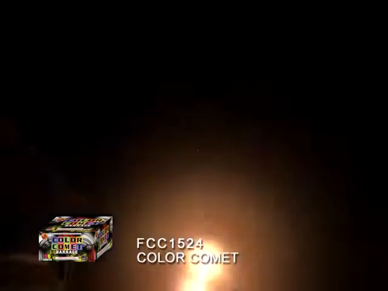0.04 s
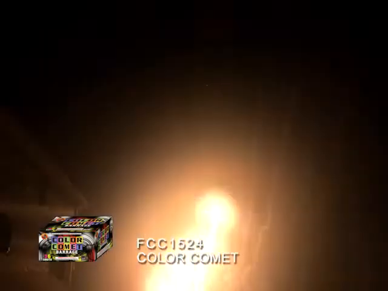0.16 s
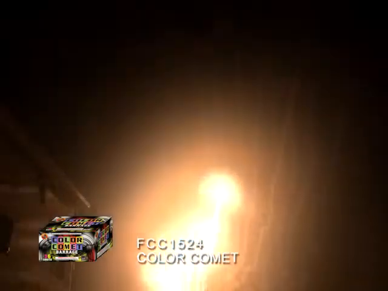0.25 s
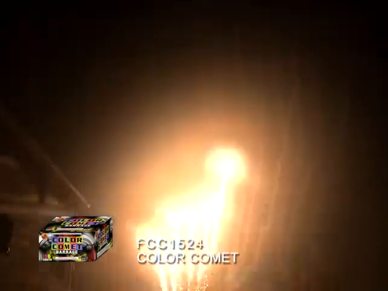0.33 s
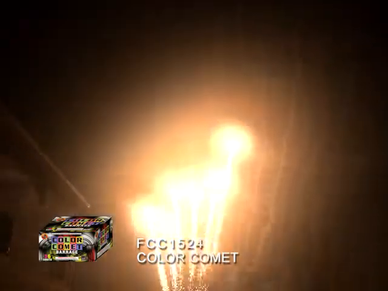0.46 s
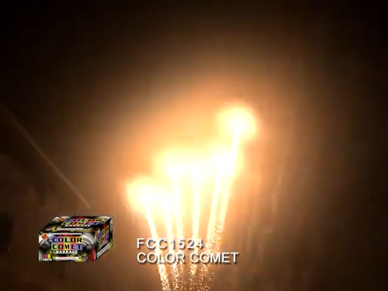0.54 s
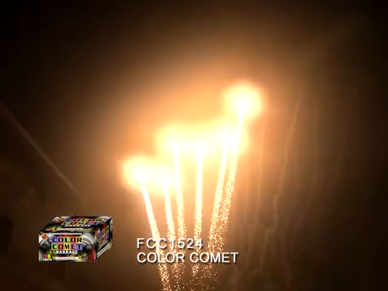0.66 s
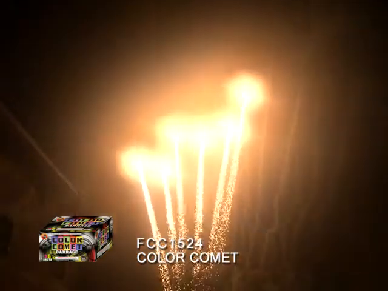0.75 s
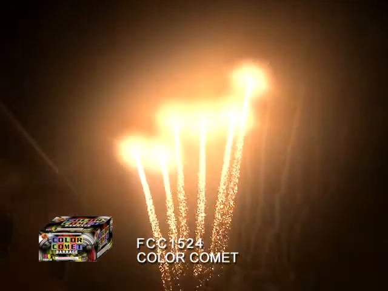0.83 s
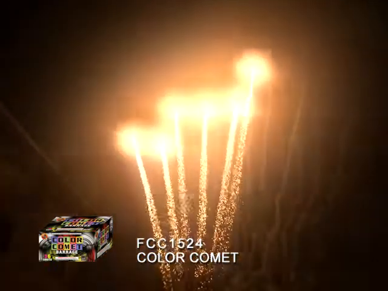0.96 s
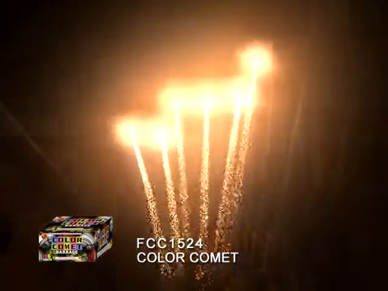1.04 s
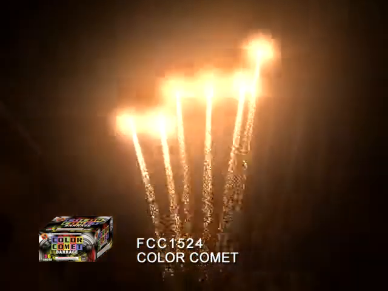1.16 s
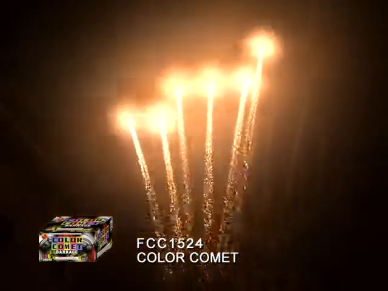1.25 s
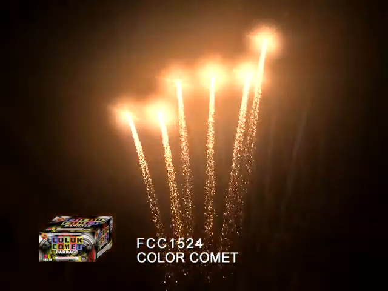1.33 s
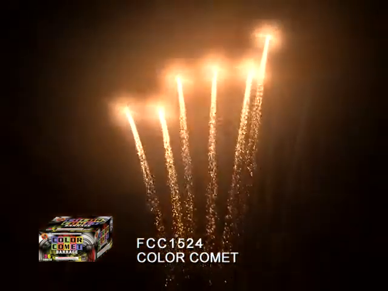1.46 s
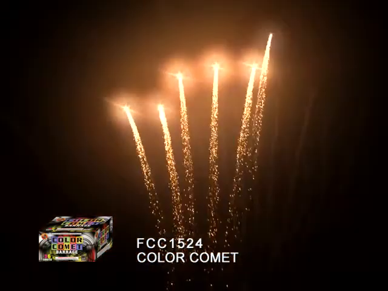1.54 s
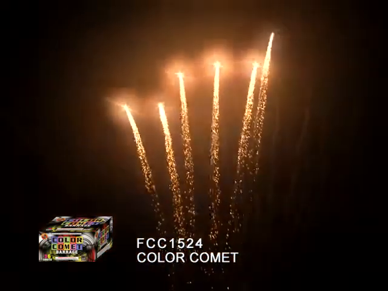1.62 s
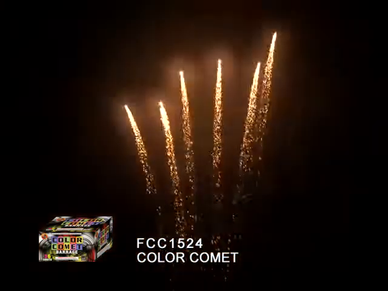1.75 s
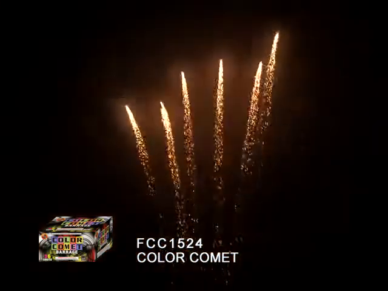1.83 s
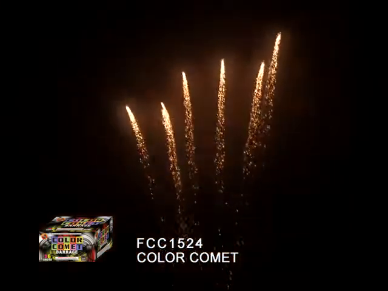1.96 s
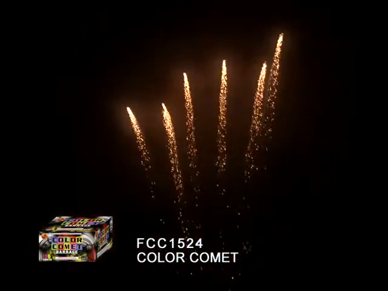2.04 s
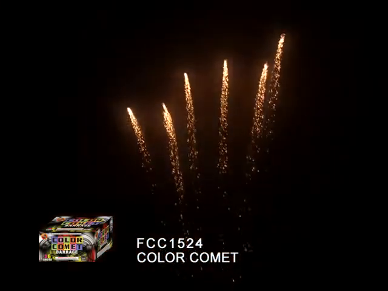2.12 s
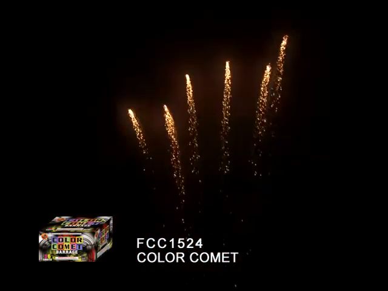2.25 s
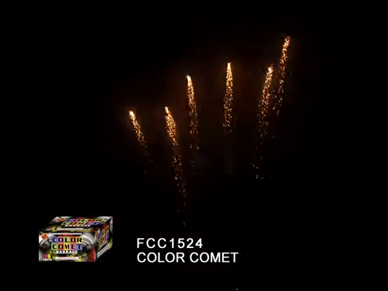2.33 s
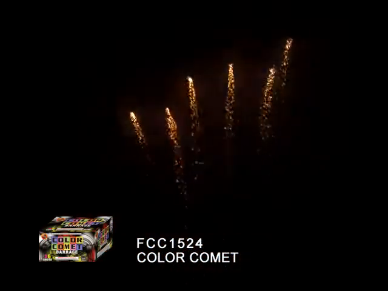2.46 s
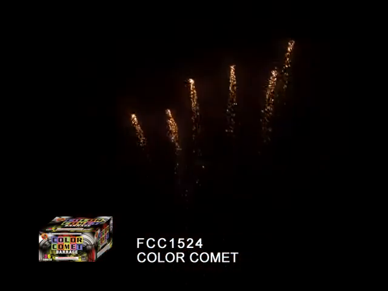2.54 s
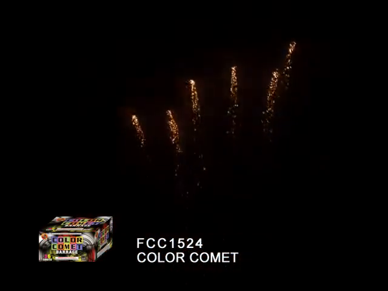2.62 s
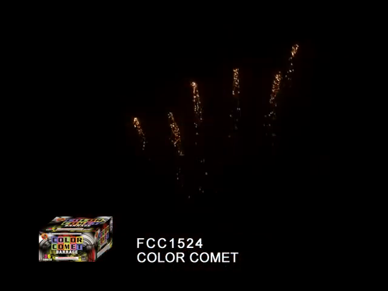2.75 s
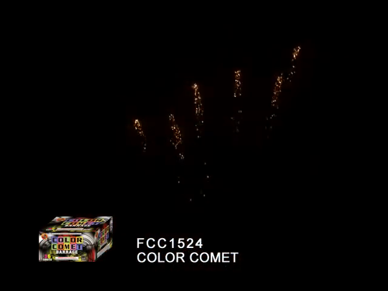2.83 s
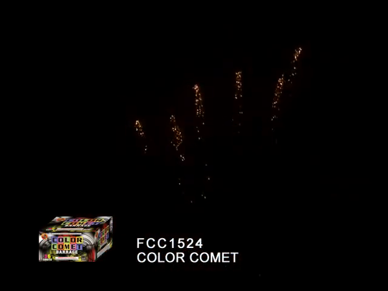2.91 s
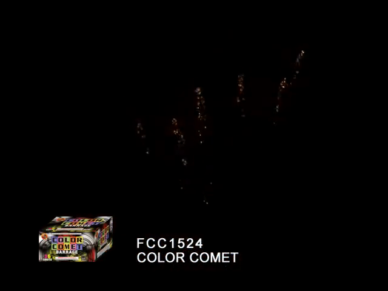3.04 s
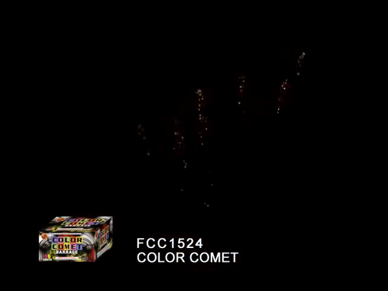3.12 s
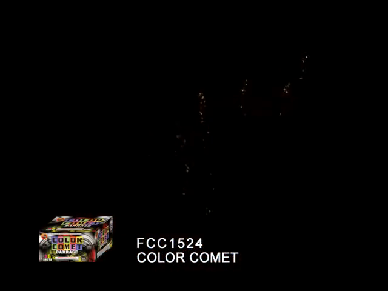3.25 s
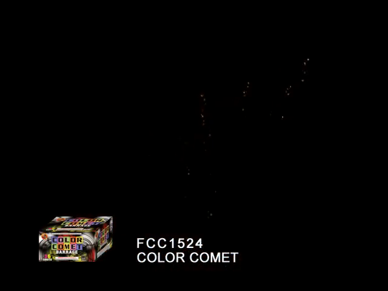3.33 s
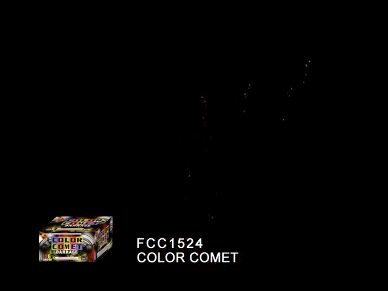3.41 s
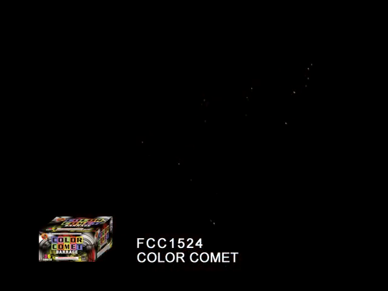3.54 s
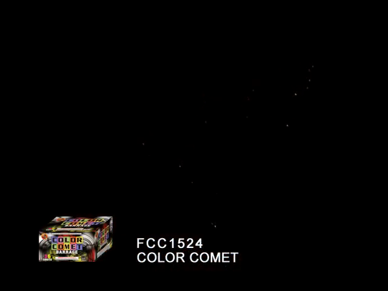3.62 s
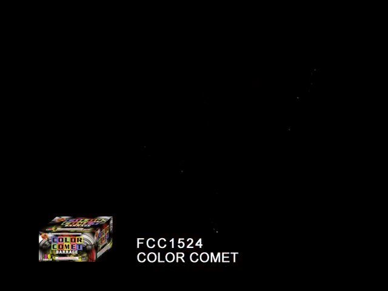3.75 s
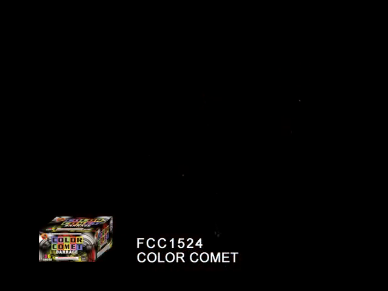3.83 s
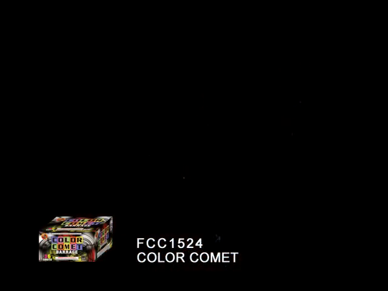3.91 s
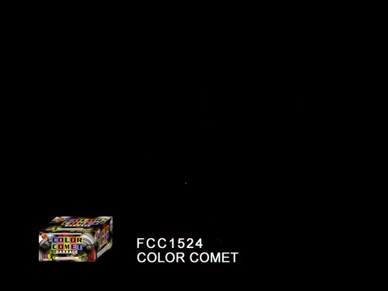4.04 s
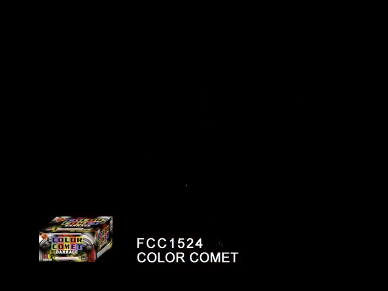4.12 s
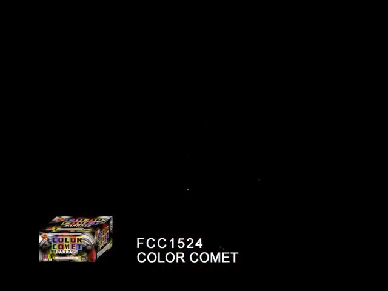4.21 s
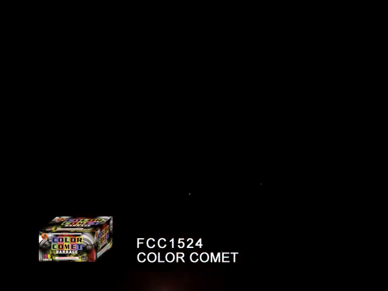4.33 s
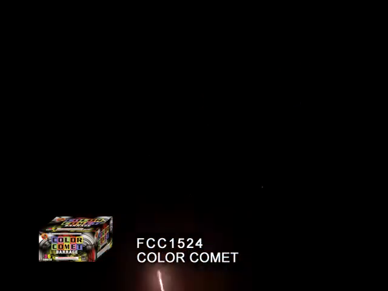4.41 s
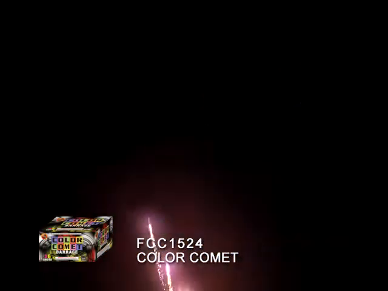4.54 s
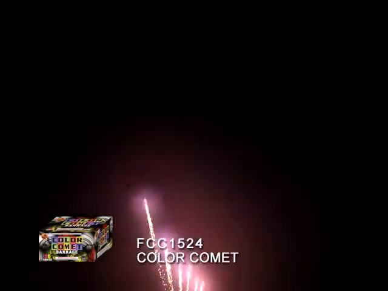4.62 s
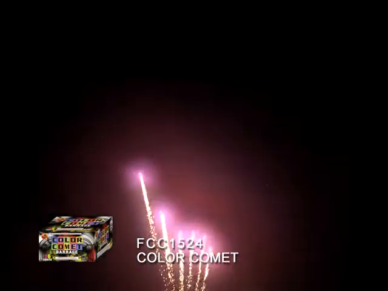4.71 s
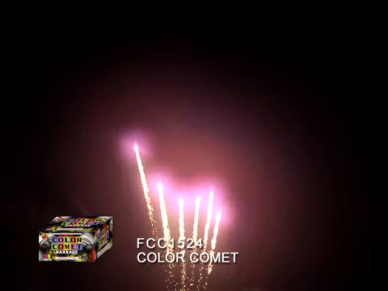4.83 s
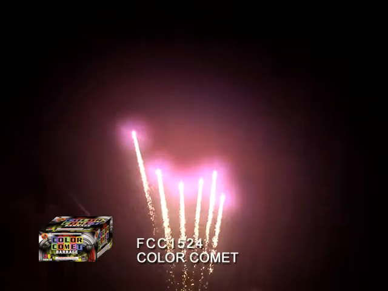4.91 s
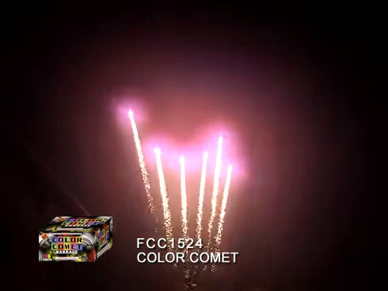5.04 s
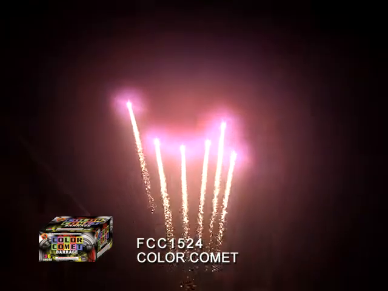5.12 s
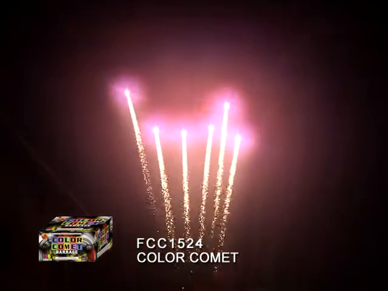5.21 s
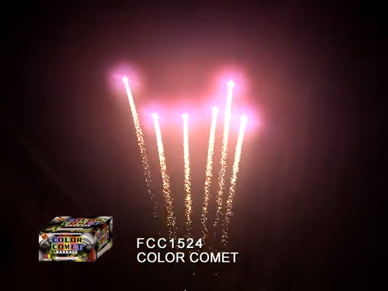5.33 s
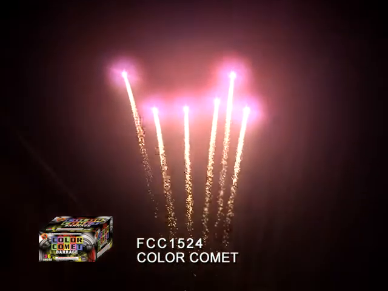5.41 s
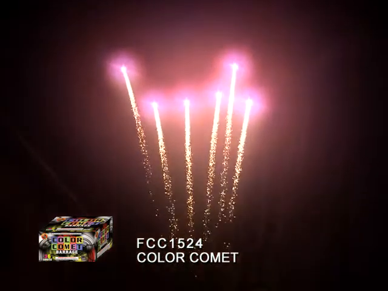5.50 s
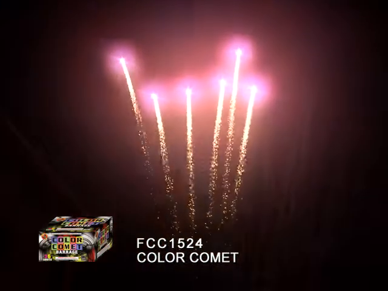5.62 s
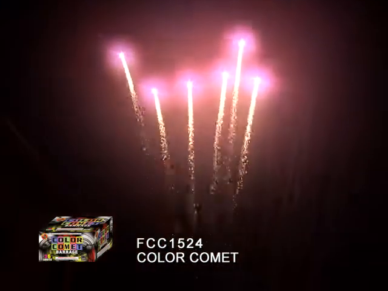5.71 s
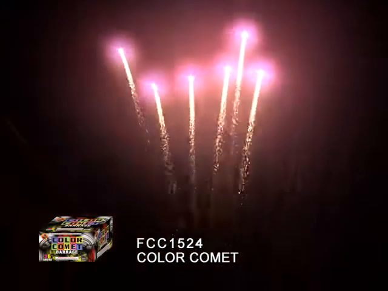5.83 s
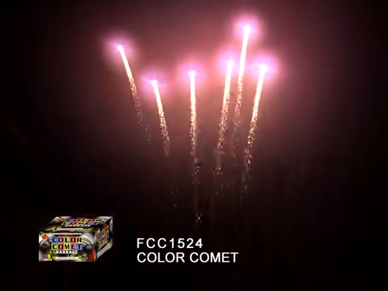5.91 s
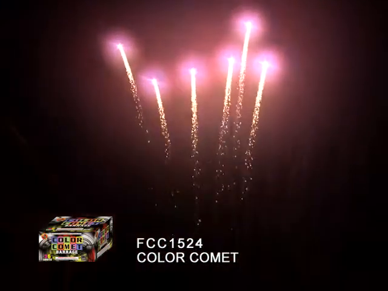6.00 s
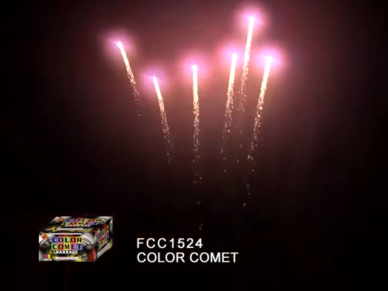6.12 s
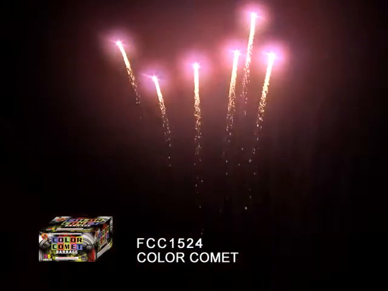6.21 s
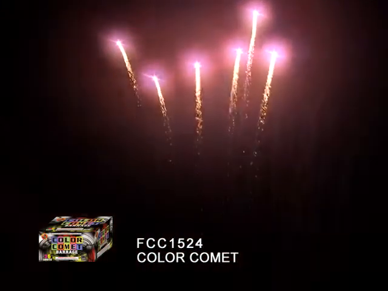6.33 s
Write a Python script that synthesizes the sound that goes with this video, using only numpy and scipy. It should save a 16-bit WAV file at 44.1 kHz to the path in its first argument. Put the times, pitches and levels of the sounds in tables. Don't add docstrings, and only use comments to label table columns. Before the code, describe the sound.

Two volleys of hard, overloaded firework bangs crack and echo between yard walls, sparks fizzing away over faint traffic rumble; nearly all on the left.

```python
import sys
import numpy as np
from scipy import signal
from scipy.io import wavfile
from scipy.ndimage import uniform_filter1d

SR = 44100
rng = np.random.default_rng(int(sys.argv[2]) if len(sys.argv) > 2 else 0)


def elevation(decibels):
    levels = np.asarray(decibels, float)
    return 10 ** (levels / 20)


def generate_wav(sig):
    pcm = np.round(np.clip(np.atleast_2d(sig).T, -1, 1) * 32767).astype(np.int16)
    wavfile.write(sys.argv[1], SR, pcm)


N = 280520

# (time [s], shock peak [dB],
# spark spit [dB])
SHARP_SHOCKS = [(0.2014, -1, -13), (0.3141, 2, -11), (0.3894, -6, -14.5), (0.4178, -0.5, -23),
                (0.573, -10, -38), (0.6394, -27.5, -36), (0.666, -8.5, -44), (0.7094, -34, -55),
                (4.6189, -3.5, -13), (4.6885, -4.5, -18), (4.76, -4.5, -15), (4.7994, -13, -18),
                (4.8304, -9.5, -20), (4.8569, -19, -25), (5.0394, -24, -31), (5.0894, -29, -44)]
# (frequency [Hz], level [dB])
FIZZ_COLOUR = [(200, -21.5), (800, 2.5), (2000, -1), (4300, 1), (6500, -0.5), (8500, -5.5), (11000, -11),
               (15000, -22)]


def evened(x):
    return x / np.sqrt(np.mean(x ** 2) + 1e-20)


def read(points, hz):
    f, value = np.transpose(points)
    return np.interp(np.log(hz + 1), np.log(f + 1), value)


def coloured(x, points):
    hz = np.abs(np.fft.fftfreq(4096, 1 / SR))
    log_gain = np.log(elevation(np.maximum(read(points, hz), -100)))
    min_phase = np.exp(np.conj(signal.hilbert(log_gain)))
    taps = np.fft.ifft(min_phase).real[:2048]
    return signal.oaconvolve(x, taps / np.linalg.norm(taps))[:len(x)]


def resonate(x, hz, width):
    r = np.exp(-np.pi * width / SR)
    return 2 * signal.lfilter([1 - r], [1, -r * np.exp(2j * np.pi * hz / SR)], x).real


def grains(per_s, spread_db):
    size = elevation(spread_db * np.minimum(rng.exponential(1, N), 5))
    size = size * rng.choice([-1, 1], N)
    return evened(size * (rng.random(N) < per_s / SR))


def flutter(hz, depth_db):
    knots = rng.standard_normal(int(N / SR * hz) + 3)
    return elevation(depth_db * np.interp(np.arange(N) / SR * hz, np.arange(len(knots)), knots))


def envelope(events, rise_s):
    out = np.zeros(N)
    for s, db, t60 in events:
        part = out[round(s * SR):][:round(t60 * SR)]
        u = np.arange(len(part)) / SR
        part += elevation(db - 60 * u / t60) * (1 - np.exp(-u / rise_s))
    return out


def waver(hz, slip):
    return np.sqrt(2) * np.sin(2 * np.pi * np.cumsum(hz * flutter(5.3, 9.12 * slip)) / SR)


def since(s):
    age = np.arange(N) / SR - s
    return age, np.clip(age / 0.0007, 0, 1) + 0.028 * (age > -.003)


def patchy(x, depth_db):
    z = signal.stft(x, nperseg=512)[2]
    patches = uniform_filter1d(rng.standard_normal(z.shape), size=4, axis=0)
    patches = uniform_filter1d(patches, size=8, axis=1)
    return signal.istft(z * elevation(depth_db * evened(patches)), nperseg=512)[1][:N]


def open_input():
    # (time [s], height [dB])
    thumps = [
        (1.6725, -27),
        (2.3525, -28.5),
        (2.8922, -29),
        (4.3322, -28.5),
    ]
    # (frequency [Hz], level [dB])
    hiss_colour = [(100, 0), (6000, 0), (11000, -2), (13000, -8), (14200, -20), (16000, -40)]
    t, step = np.arange(N) / SR, np.zeros(N)
    slope_s = .0075
    for s, db in thumps:
        up = np.clip((t - s) / slope_s, 0, 1)
        down = np.clip((t - s - .02) / slope_s, 0, 1)
        step += elevation(db) * (up - down)
    for tau_s in (.0125, .07):
        r = np.exp(-1 / (tau_s * SR))
        step = signal.lfilter([r, -r], [1, -r], step)
    hiss = coloured(rng.standard_normal(N), hiss_colour)
    ripple = evened(resonate(resonate(rng.standard_normal(N), 280., 300), 280., 400))
    ripple = ripple * uniform_filter1d(np.abs(step), size=900)
    return step + elevation(-27) * ripple + elevation(-77.6) * hiss


def town():
    # (frequency [Hz], density [dB per Hz])
    rumble_colour = [(18, -38), (30, -17), (85, -16.5), (213, -11), (243, -12.5), (359, -17), (432, -18),
                     (970, -16), (1080, -13), (2180, -22.5), (2360, -24), (13300, -48), (15500, -78)]
    # (loudest [s], length [s], whine [dB], whine [Hz], blur [0-1])
    traffic = [
        (0.05, 1.2, -51, 1080, 0.6),
        (1.4, 1.6, -51, 1095, .5),
        (2.45, 1.24, -50.5, 1090, 0.08),
        (3.24, 0.8, -53, 1090, 0.35),
        (3.83, 0.81, -48, 1075, 0.4),
        (4.39, 0.7, -52.5, 1027, 0.7),
        (5.5, 1.1, -68, 1060, 0.4),
    ]
    # (frequency [Hz], level [dB])
    generator = [(59, -64), (118.4, -59), (177.6, -65.5), (215.3, -59), (300, -64.5)]
    rumble_db, swell_db = -45, -2
    t, air = np.arange(N) / SR, rng.standard_normal(N)
    rumble = coloured(rng.standard_normal(N), rumble_colour) * flutter(4.2, 0.37)
    passing, whine = 0, 0
    for s, length, db, hz, blur in traffic:
        near = elevation(db) * np.clip(1 - (2 * (t - s) / length) ** 2, 0, 1)
        passing = passing + near
        tone = waver(hz, 0.00386) * flutter(11, 2.5)
        fuzz = evened(resonate(air, hz, 60))
        whine = whine + near * ((1 - blur) * tone + blur * fuzz)
    hum = sum(elevation(db) * waver(f, 0.015) * flutter(8.1, 4.6) for f, db in generator)
    preamp = elevation(-72) * rng.standard_normal(N)
    return preamp + (elevation(rumble_db - 1.5) + elevation(swell_db) * passing) * rumble + whine + hum


def far_bangs():
    # (time [s], peak [dB], t60 [s], brightness [dB])
    bursts = [
        (0.1194, -55, 0.67, 8),
        (1.8194, -32, 0.19, -3),
        (2.3994, -34, 0.78, -3),
        (2.972, -34, 1, -1),
        (3.5204, -44.5, 0.71, -7),
        (4.1314, -41.5, 1, -23),
    ]
    # (frequency [Hz], level [dB])
    distant_colour = [(470, -36), (800, -3), (969, -15), (1050, -6), (1250, -14), (1400, -19), (1830, 8),
                      (2190, -19), (2650, 1), (3250, 5), (3750, -17), (4430, -1.5), (5700, -12),
                      (6580, -19), (14000, -46)]
    body = envelope([(s, db, t60) for s, db, t60, _ in bursts], 0.011)
    body = body * coloured(grains(6000, 2.2), distant_colour)
    edge = envelope([(s, db + bright, t60) for s, db, t60, bright in bursts], 0.0027)
    edge = edge * coloured(grains(9000, 4.8), FIZZ_COLOUR)
    edge = signal.sosfilt(signal.butter(2, 8500, fs=SR, output="sos"), edge)
    return elevation(-5.0) * body + elevation(-8) * edge


def roar(depth, offset_db):
    # (time [s], loudness [dB], extra depth [dB])
    volleys = [
        [(0.2, -10.5, -0.5), (0.43, -10.5, -1.5), (0.628, -15, -6.5), (0.645, -13, -4.5), (0.69, -14, -1.5),
         (0.74, -22, -1.5), (0.99, -30, -4), (1.55, -45, -3), (2.4, -54.5, -11)],
        [(4.617, -11.5, -0.5), (4.86, -10, -1), (4.9, -12, -2), (5.01, -13.5, -4.5), (5.1, -13.5, -2.5),
         (5.13, -17.5, -3), (5.21, -23.5, -3), (5.6, -35, -5), (6.36, -43.5, -5)],
    ]
    knee_db, overload = -14, 1.52
    out, t = np.zeros(N), np.arange(N) / SR
    for rows in volleys:
        s, loud_db, depth_db = np.transpose(rows)
        heard_db = np.interp(t, s, loud_db + depth * depth_db) + offset_db
        true_db = heard_db + overload * np.maximum(heard_db - knee_db, 0)
        out += elevation(true_db) * since(s[0])[1] * np.clip((s[-1] - t) / .15 + 1, 0, 1)
    return out


def spit():
    return envelope([(s, db, 0.22) for s, _, db in SHARP_SHOCKS], 0.0068)


def echoes():
    # (frequency [Hz], level [dB])
    boom_colour = [(40, -50), (90, -5), (136, -6), (250, -3), (360, -1.5), (480, 0.5), (600, 0.5),
                   (760, -6), (1500, -63)]
    crack_colour = [(300, -46), (780, -10), (950, -1), (1400, -0.5), (1750, -4), (2200, -14), (4000, -13),
                    (9000, -50.5), (15000, -58)]
    rattle_colour = [(1200, -35.5), (1900, -1), (2400, -1), (3200, -4.5), (3700, -5), (5000, -8.5),
                     (9000, -30.5), (15000, -41)]
    # (frequency [Hz], width [Hz], level [dB])
    yard_modes = [(484, 38, -1), (916, 13, 2), (1300, 56, -11), (1643, 69, -2.5), (2280, 33, -9),
                  (3080, 115, 5)]
    # (frequency [Hz], width [Hz], t60 [s], strikes (time [s], level [dB]))
    near_walls = [(140.3, 10, 0.72, [(.4, -12)]), (356, 51, .5, [(.3, -1.5), (4.78, -9)]),
                  (384, 80, 0.48, [(.205, -3)]), (457.8, 10.5, .93, [(.4, -9.5)]),
                  (476, 19, 0.3, [(.279, -8), (4.639, -5), (4.94, -9)]), (560, 33, 1.5, [(1.25, -40.5)]),
                  (611, 34, 0.23, [(4.86, -5)]), (945, 30, 0.41, [(.375, -7), (.8, -32)]),
                  (995, 110, 0.24, [(4.62, -0.5)]), (1170, 36, .45, [(.21, -7.5), (.44, -13)]),
                  (1364, 30, 0.56, [(.64, -14.5), (4.915, -9.5), (4.99, -12.5), (5.08, -22), (5.24, -24)]),
                  (1654, 43, 0.64, [(.215, -5.5), (.27, -11), (.49, -16), (.645, -18.5), (4.82, -12)]),
                  (2340, 140, 0.7, [(.46, -15), (.62, -20.5), (5.03, -29)])]
    far_walls = [(416, 11, 1, [(3.22, -55)]), (620, 400, 0.42, [(2.98, -41.5)]),
                 (1000, 170, 0.22, [(2.41, -42), (4.04, -44), (4.13, -38.5)]), (890, 25, 1, [(3.62, -50)]),
                 (1780, 200, 1, [(2.98, -54)]), (3270, 200, .5, [(2.42, -45)]),
                 (4750, 220, .5, [(2.41, -46)]), (6440, 800, 0.37, [(2.98, -58), (3.53, -55), (4.13, -68)])]
    rattle_db = -4
    field = coloured(grains(3000, 2.3), boom_colour) * roar(0.97, 0) * flutter(25, 0.81)
    field += coloured(grains(5000, 3.06), crack_colour) * roar(0, 0) * flutter(40, 0.37)
    shaken = roar(-0.36, rattle_db - 1.5) + elevation(3.5) * spit()
    field += coloured(grains(7000, 2.76), rattle_colour) * shaken * flutter(40, 1.8)
    field = patchy(field, 1.6)
    air, song = rng.standard_normal(N), np.zeros(N)
    for hz, width, t60, struck in near_walls + far_walls:
        ring = envelope([(s, db, t60) for s, db in struck], 0.0041)
        song += ring * evened(resonate(air, hz, width))
    between_walls = sum(elevation(db - 5.0) * resonate(field, hz, width) for hz, width, db in yard_modes)
    return elevation(-1) * field + between_walls + song


def burning():
    # (lit [s], fizz [dB], fade while climbing [dB/s])
    fans = [
        (0.2, -29, 8.5),
        (4.617, -31.5, 5.5),
    ]
    burn_s, burn_out_db_per_s = 1.685, 16
    out = np.zeros(N)
    for s, db, fade_db in fans:
        age, gate = since(s)
        burnt_out = np.maximum(age - burn_s, 0)
        out += gate * elevation(db - fade_db * age - burn_out_db_per_s * burnt_out)
    return out


def comets():
    # (time [s], peak [dB])
    stray = [
        (1.0306, -24),
        (1.0803, -25),
        (1.6005, -25),
        (2.1955, -30.5),
        (2.2194, -31.5),
        (2.3785, -37),
        (3.8157, -51),
        (3.937, -65),
        (4.5002, -47),
    ]
    fizz = coloured(grains(12000, 2.9), FIZZ_COLOUR) * (burning() + spit()) * flutter(30, 1.0)
    snaps = envelope([(s, db, .012) for s, db in stray], 0.00028)
    snaps = snaps * coloured(rng.standard_normal(N), FIZZ_COLOUR)
    return elevation(4.0) * fizz + elevation(-3) * snaps


def shots():
    # (frequency [Hz], level [dB])
    spray_colour = [(800, -16), (2500, 8.5), (6000, 13), (10000, -11.5), (15500, 1.5)]
    front = np.zeros(N)
    for s, db, _ in SHARP_SHOCKS:
        front[round(s * SR)] = elevation(db + 7)
    u = np.arange(600) / SR / 0.0002
    blast = (1 - u) * np.exp(-u)
    spray = envelope([(s, db, .04) for s, db, _ in SHARP_SHOCKS], 0.0012)
    spray = spray * coloured(grains(9000, 1.4), spray_colour)
    return signal.oaconvolve(front, blast)[:N] + elevation(-2.5) * spray


def scene():
    yard = echoes() + shots() + comets() + far_bangs() + town()
    return np.array([elevation(6) * yard, open_input()])


def thin_treble(x, from_hz, keep_db, grit_db):
    # (frame level [dB], edge [Hz])
    band_edge = [(-40, 14300), (-30, 14900), (-14, 15000), (-8, 15800)]
    hz, _, z = signal.stft(x, SR, "cosine", nperseg=2048, noverlap=1024)
    local = np.sqrt(uniform_filter1d(np.abs(z) ** 2, size=32, axis=0))
    reach = np.clip(np.log2(hz / from_hz + 1e-9), 0, 1.5)[:, None]
    treble = np.abs(signal.sosfilt(signal.butter(4, 8000, "high", fs=SR, output="sos"), x))
    jumps = uniform_filter1d(treble, size=200) > 1.7 * uniform_filter1d(treble, size=2048)
    jumps = np.flatnonzero(jumps) // 1024
    attack = np.isin(np.arange(z.shape[1]), [jumps, jumps + 1])
    keep = (np.abs(z) >= elevation(keep_db) * reach * local) | attack
    z = z + elevation(grit_db) * local * ~attack * np.exp(2j * np.pi * rng.random(z.shape))
    level_db = 10 * np.log10((local ** 2).sum(0) + 1e-12)
    keep &= hz[:, None] < np.interp(level_db, *np.transpose(band_edge))
    return signal.istft(z * keep, SR, "cosine", nperseg=2048, noverlap=1024)[1][:N]


def band_limit(x):
    return signal.sosfilt(signal.butter(12, 15670, fs=SR, output="sos"), x)


def record(dry):
    # (frequency [Hz], width [Hz], level [dB])
    housing = [(3637, 984, -9.5), (5010, 1260, -5.5), (9320, 2270, -6)]
    left = signal.sosfilt(signal.butter(2, 90, "high", fs=SR, output="sos"), dry[0])
    for hz, width, db in housing:
        left = left - (1 - elevation(db)) * resonate(left, hz, width)
    left = left / (1 + np.abs(left / .945) ** 7) ** (1 / 7)
    left = signal.sosfilt(signal.butter(2, 45, "high", fs=SR, output="sos"), left)
    left = signal.sosfilt(signal.butter(1, 15000, fs=SR, output="sos"), left)
    left = thin_treble(left, from_hz=5630, keep_db=1.2, grit_db=-16.0)
    return band_limit(np.array([left, dry[1]]))


dry = scene()
out = record(dry)
generate_wav(out)
```